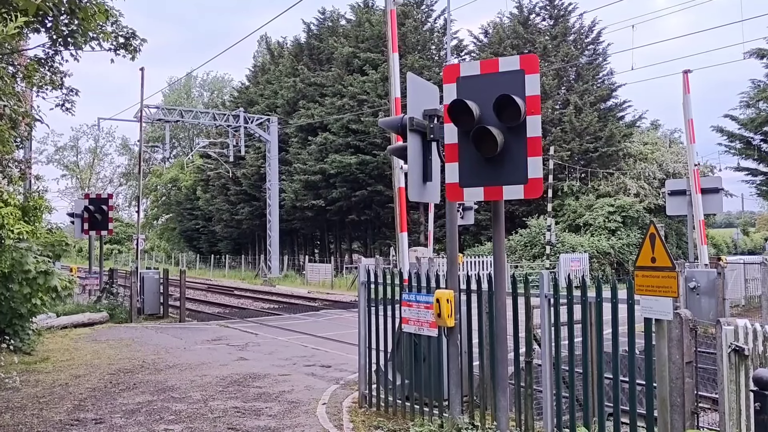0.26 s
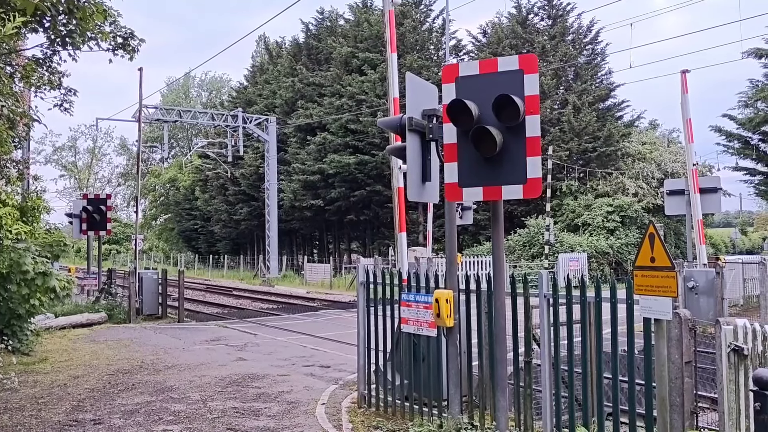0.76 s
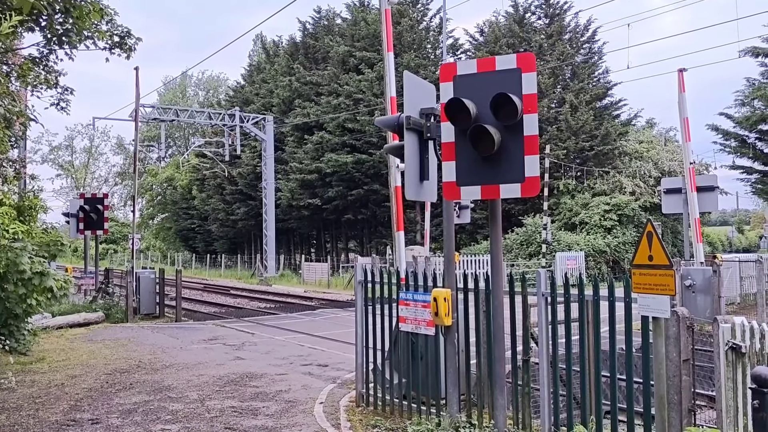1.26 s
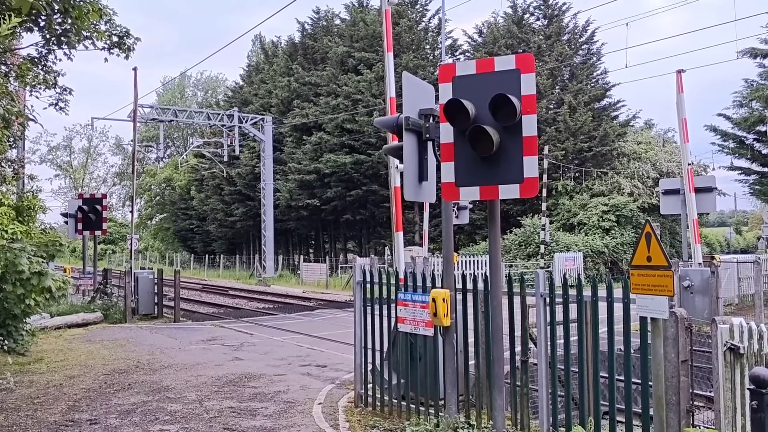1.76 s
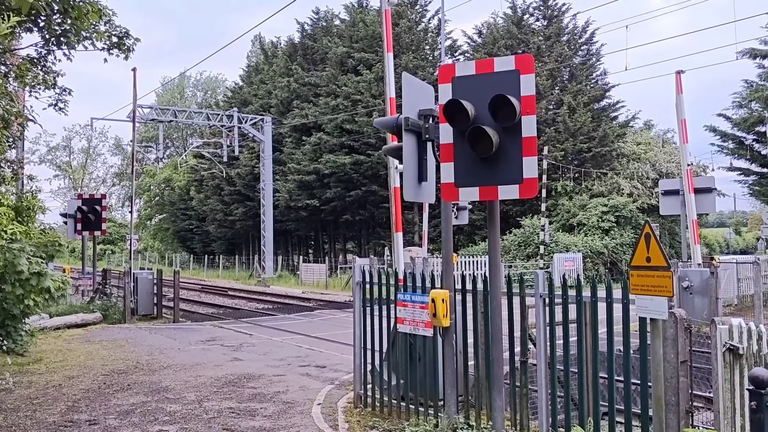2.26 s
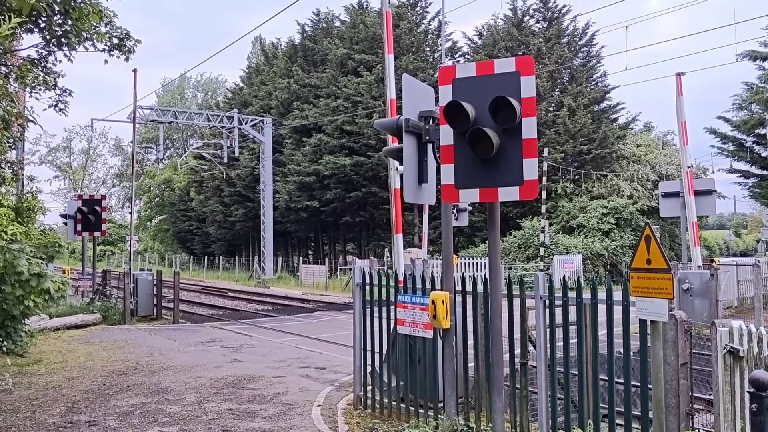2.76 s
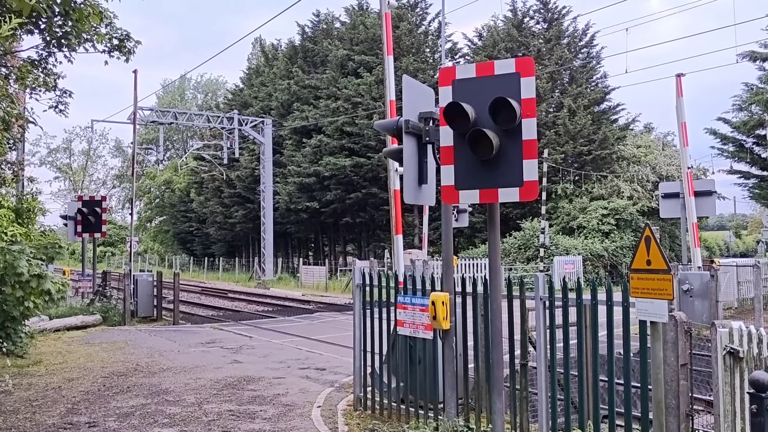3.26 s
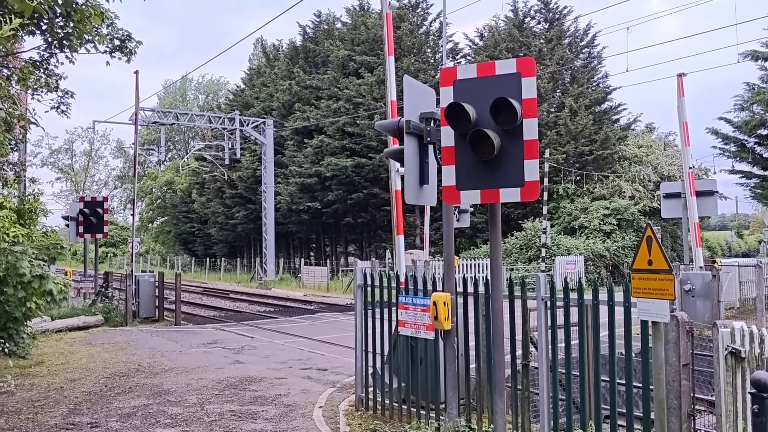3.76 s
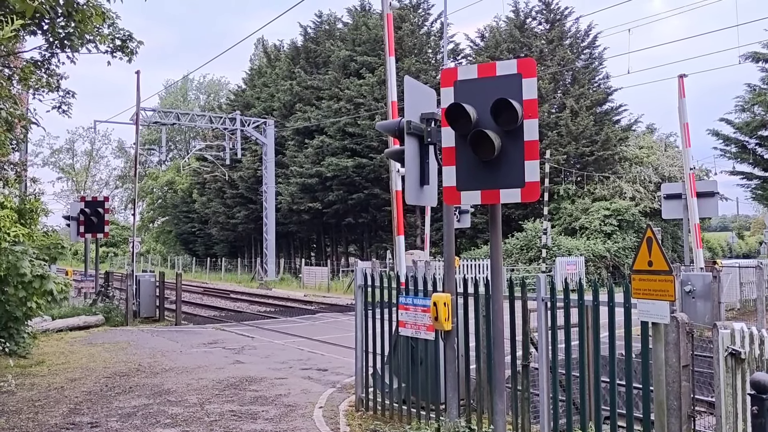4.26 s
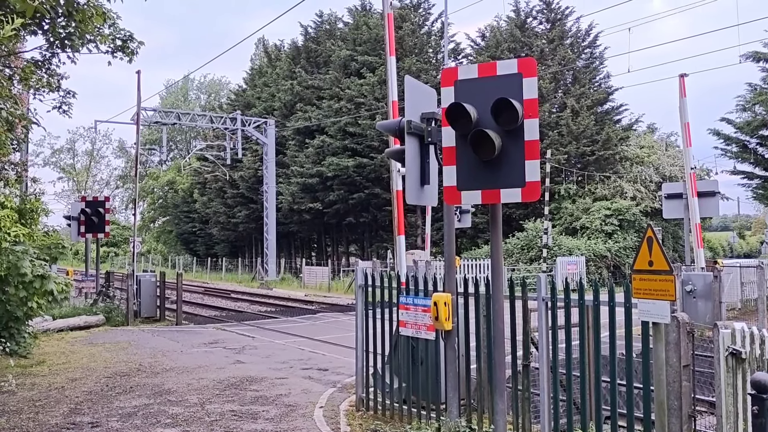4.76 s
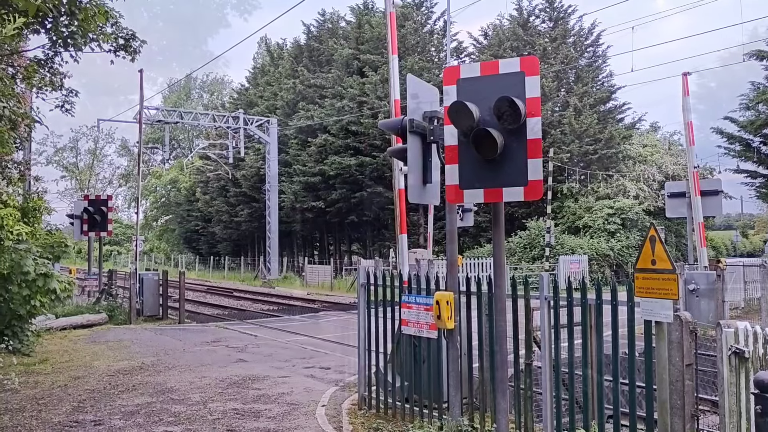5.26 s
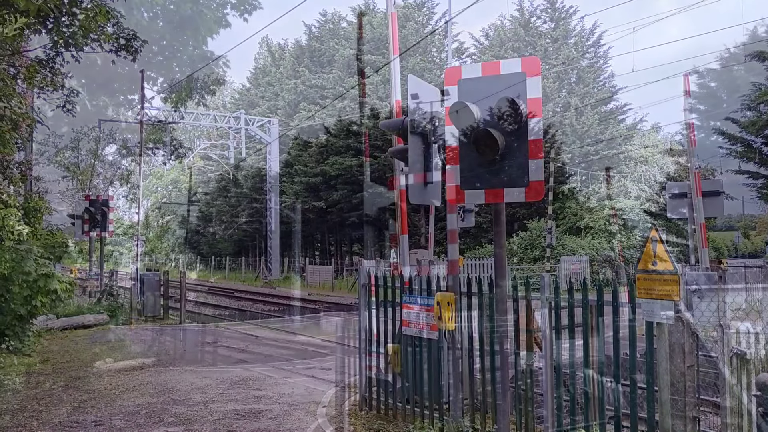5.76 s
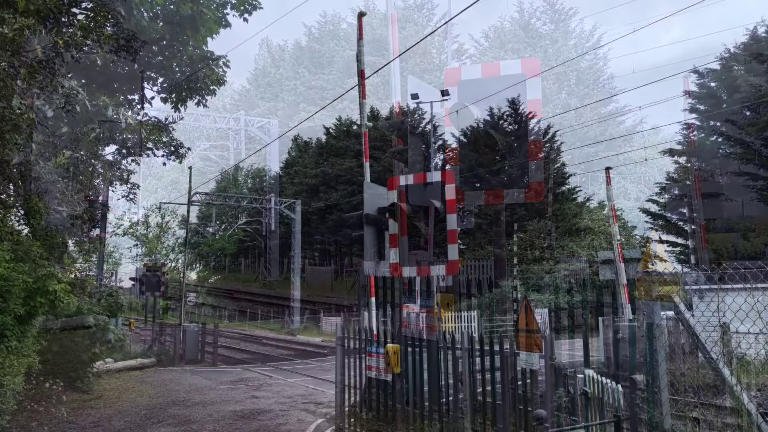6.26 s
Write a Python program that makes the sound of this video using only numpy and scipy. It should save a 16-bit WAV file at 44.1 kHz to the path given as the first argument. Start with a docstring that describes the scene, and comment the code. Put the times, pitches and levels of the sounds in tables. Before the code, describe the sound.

Clattering rods under crossing barriers knock in irregular bursts, with short dry squeaks and loose jingling between them, densest in the first two seconds and nearly gone by four. A small bird buzzes twice, chirps three times, buzzes twice more, then chirps four times, with tree echo. Distant hush and soft wind thumps on the close stereo microphone continue underneath.

```python
"""Level crossing barriers reach upright beside a country lane, over a steady hush and wind-bumped microphones.
From the start their hanging skirts clash, jingle and squeak: random impacts excite decaying modes.
A small bird soon gives rising buzzes, swept by a fast trill, then sharp chirps, slurred tones echoing off trees.
Later, far birds whistle as wavering sines. The hollow booms hum until the swaying dies away near the end."""
import sys
import numpy as np
from scipy import signal
from scipy.fft import rfft, irfft, next_fast_len
from scipy.io import wavfile
from scipy.ndimage import uniform_filter1d

SR = 44100
rng = np.random.default_rng(int(sys.argv[2]) if len(sys.argv) > 2 else 0)


def to_wav(sig):
    """Store sig (one row per channel, or 1-D mono) as 16-bit WAV at the path in sys.argv[1].

    Samples outside -1..1 are clipped; the rate is SR.
    """
    pcm = np.clip(np.atleast_2d(sig), -1, 1) * 32767
    pcm = np.round(pcm).astype(np.int16)
    wavfile.write(sys.argv[1], SR, pcm.T)  # frames by channels


N = 287091
T = np.arange(N) / SR  # s


def amp(db):
    """Level definition: converts decibels to an amplitude ratio."""
    return 10 ** (np.asarray(db) / 20)


def unit(x):
    """Power normalisation: scales to rms 1."""
    return x / np.sqrt(np.mean(x ** 2) + 1e-20)


def read(points, hz):
    """Interpolation: reads a table on a log-frequency axis."""
    f, value = np.transpose(points)
    return np.interp(np.log(hz + 1), np.log(f + 1), value)


def add(mix, s, sound):
    """Superposition: adds a sound into the mix, in place, at time s."""
    at = round(s * SR)
    sound = sound[..., max(-at, 0):]
    part = mix[..., max(at, 0):][..., :sound.shape[-1]]
    part += sound[..., :part.shape[-1]]


def colour(x, points):
    """Spectral shaping: filters by a relative spectrum; white noise keeps its power."""
    size = next_fast_len(x.shape[-1] + 4096)
    gain = unit(amp(read(points, np.fft.rfftfreq(size, 1 / SR))))
    return irfft(rfft(x, size) * gain, size)[..., :x.shape[-1]]


def lean(pair, points):
    """Interchannel level difference: tilts a stereo pair left or right, band by band."""
    size = next_fast_len(N + 4096)
    side_db = read(points, np.fft.rfftfreq(size, 1 / SR)) / 2
    return irfft(rfft(pair, size) * amp([side_db, -side_db]), size)[:, :N]


def drift(size, rate):
    """Slow random modulation: joins random values, rate of them a second, by straight lines."""
    at = np.arange(size) * rate / SR
    return np.interp(at, np.arange(4096), rng.standard_normal(4096))


def knocks(per_s, spread_db):
    """Random impulse process: a stream of tiny contacts of uneven size."""
    signs = rng.choice([-1., 1.], N)
    sizes = signs * amp(spread_db * np.clip(rng.standard_normal(N), -2, 2))
    return unit(sizes * (rng.random(N) < per_s / SR))


# Reverberation time of the tree echo: (f/Hz, t60/s)
TREE_T60 = [(200, 0.98), (1000, 0.64), (4400, 0.46), (8000, 0.44), (15000, 0.055)]


def outdoors(x, lag, near_db, near_t60, far_db, alike):
    """Multipath propagation: direct sound (left leads by lag samples), near scatter, long echo off trees."""
    taps = rng.choice([-1., 1.], (5, SR)) * (rng.random((5, SR)) < .06)
    t = np.arange(SR) / SR
    # alike: share of the scatter that arrives from the source's direction
    directed = np.array([taps[4], np.roll(taps[4], lag)])
    scatter = np.sqrt(alike) * directed + np.sqrt(1 - alike) * taps[:2]
    near = scatter * amp(-60 * t / near_t60) * (t > .002)
    # the tree echo builds up over 39 ms, and each band decays at its own rate
    hz, when, z = signal.stft(taps[2:4] * np.minimum(t / 0.039, 1), SR, nperseg=256)
    decay = amp(-60 * when / read(TREE_T60, hz)[:, None])
    far = signal.istft(z * decay, SR, nperseg=256)[1][:, :SR]
    echo = (amp(near_db) * unit(near) + amp(far_db) * unit(far)) / np.sqrt(SR)
    direct = np.array([x, np.roll(x, lag)])
    return direct + signal.fftconvolve(x[None], echo, axes=1)[:, :N]


def long_waves(pair, below_hz=950):
    """Small phase difference at long wavelengths: the lows are drawn toward the left port's signal."""
    low = signal.sosfiltfilt(signal.butter(3, below_hz, fs=SR, output="sos"), pair)
    return pair + 0.78 * (low[0] - low)


# Spectrum of the distant countryside: (f/Hz, relative level/dB)
AIR_SPECTRUM = [(20, 2), (70, 0.5), (200, -16), (370, -24), (520, -16.5), (800, -15.5), (1050, -27),
                (1650, -31), (1950, -23), (3000, -40), (5000, -52), (7000, -40.5), (8500, -56.5),
                (16000, -62)]
# Left-right correlation: (f/Hz, coefficient)
AIR_LIKENESS = [(50, 0.82), (200, 0.91), (600, 0.27), (1500, 0.088), (4000, 0.091)]
# Left minus right: (f/Hz, level/dB)
AIR_SIDE = [(100, 0.5), (800, -1.5), (1300, 0), (2300, -13), (4400, 16), (7500, 3), (14000, 3)]
AIR_START_DB, AIR_EASE_DB = -50, 4  # level before the left-right tilt, and its fall over the whole scene


def air():
    """Partially coherent noise: the steady hush of far traffic and leaves, easing slowly."""
    size = next_fast_len(N)
    hz = np.fft.rfftfreq(size, 1 / SR)
    left, other = rfft(rng.standard_normal((2, size)))
    same = np.clip(read(AIR_LIKENESS, hz), -1, 1)
    right = same * left + np.sqrt(1 - same ** 2) * other
    pair = irfft(np.array([left, right]) * amp(read(AIR_SPECTRUM, hz)), size)[:, :N]
    return lean(unit(pair), AIR_SIDE) * amp(AIR_START_DB - AIR_EASE_DB * T / T[-1])


# Strongest gusts on the microphone ports: (t/s, length/s, level/dB, left minus right/dB)
GUSTS = [(-.04, 0.16, -31.5, 14.5), (0.137, 0.17, -38, 16), (0.344, 0.078, -25.5, 14.5),
         (0.362, .2, -30.5, 6), (0.541, 0.021, -31.5, 28.5), (0.578, .16, -29.5, -3.5),
         (0.997, 0.12, -38.5, 13), (1.941, .12, -39.5, 15), (2.504, 0.18, -48, 29.5),
         (2.65, 0.068, -37, 15), (2.852, 0.548, -40, 2), (3.104, 0.069, -32, 8.5),
         (4.676, 0.06, -45.5, 18.5), (5.138, 0.032, -37.5, 10.5), (5.214, .1, -47.5, 23),
         (6.368, 0.043, -47.5, 22.5)]
# Spectrum of the gust eddies: (f/Hz, relative level/dB per Hz)
GUST_SPECTRUM = [(10, -25.5), (30, 5), (70, 3.5), (150, -7.5), (270, -22.5), (450, -37.5), (900, -47.5),
                 (3000, -83.5)]
# Spectrum of the light wind between gusts: (f/Hz, relative level/dB per Hz)
BREEZE_SPECTRUM = [(10, -21.0), (40, 19), (90, -17.0), (200, -31.5), (800, -70.0)]
BREEZE_START_DB, BREEZE_EASE_DB_PER_S = -45, 2


def wind(soft_hz=130, hard_db=-30):
    """Turbulent pressure: eddies buffet each port separately; hard gusts hold more small, higher eddies."""
    strength = np.zeros((2, N))
    for s, length, db, side_db in GUSTS:
        sides = amp([[db + side_db / 2], [db - side_db / 2]])
        add(strength, s, sides * np.sqrt(np.hanning(int(length * SR))))
    eddies = unit(colour(rng.standard_normal((2, N)), GUST_SPECTRUM))
    large = signal.sosfiltfilt(signal.butter(2, soft_hz, fs=SR, output="sos"), eddies)
    eddies = large + np.minimum(strength / amp(hard_db), 1) * (eddies - large)
    eddies /= np.sqrt(uniform_filter1d(eddies ** 2, 2200, axis=1) + 0.013)  # evens out the running level
    breeze = unit(colour(rng.standard_normal((2, N)), BREEZE_SPECTRUM))
    breeze_db = BREEZE_START_DB - BREEZE_EASE_DB_PER_S * T + 2.7 * drift(N, 19.0)
    return strength * eddies + breeze * amp(breeze_db)


# Whistles of far birds: (t/s, length/s, f/Hz, level/dB before echo and mix)
WHISTLES = [(2.96, 0.11, 5160, -73), (3.149, .65, 7050, -79), (3.957, .33, 5530, -72),
            (5.218, 0.022, 2604, -59), (5.87, .09, 3200, -76), (5.903, 0.18, 5570, -67.5),
            (6.131, 0.27, 7100, -73), (6.353, 0.23, 5270, -67)]


def far_birds(waver=.02):
    """Frequency modulation: thin whistles from deep in the trees waver by a share of their pitch."""
    out = np.zeros(N)
    for s, length, hz, db in WHISTLES:
        size = int(length * SR)
        phase = 2 * np.pi * np.cumsum(hz * (1 + waver * drift(size, 250))) / SR
        add(out, s, amp(db) * np.sin(phase) * signal.windows.tukey(size, .5))
    return out


# The bird's buzzes: (t/s, level/dB before swell, echo and mix)
BUZZES = [(0.554, -27.5), (1.616, -27), (3.682, -26), (4.748, -27)]
BUZZ_S, BUZZ_SWELL_S = .157, 0.047
BUZZ_LOW_HZ, BUZZ_LOW_RISE_HZ = 3224, 340  # bottom of the trill: lifts late
BUZZ_HIGH_HZ, BUZZ_HIGH_RISE_HZ = 3675, 1670  # top of the trill: climbs and levels off


def buzzes(trill_hz=69, overtone_db=-54, start_db=-30):
    """Wide frequency modulation: a fast trill sweeps a rising whistle up and down, loudest in mid-sweep."""
    out = np.zeros(N)
    t = np.arange(0, BUZZ_S, 1 / SR)
    low = BUZZ_LOW_HZ + BUZZ_LOW_RISE_HZ * (t / BUZZ_S) ** 2
    high = BUZZ_HIGH_HZ + BUZZ_HIGH_RISE_HZ * np.sin(np.pi / 2 * t / BUZZ_S)
    swell = amp(start_db * np.exp(-2 * t / BUZZ_SWELL_S)) * signal.windows.tukey(len(t), .1)
    for s, db in BUZZES:
        trill = 2 * np.pi * np.cumsum(trill_hz * (1 + 0.033 * drift(len(t), 81.3))) / SR
        height = (1 + signal.sawtooth(trill, .5)) / 2  # triangle between low (0) and high (1)
        phase = 2 * np.pi * np.cumsum(low + (high - low) * height) / SR
        voice = np.sin(phase) + amp(overtone_db) * np.sin(2 * phase)
        voice *= .25 + np.sin(np.pi * height) ** 2
        add(out, s, amp(db) * unit(voice) * swell)
    return out


# The bird's chirps: (t/s, top f/Hz, level/dB before swell, echo and mix)
CHIRPS = [(2.097, 4393, -20.5), (2.35, 4320, -22), (2.614, 4392, -17), (5.262, 4440, -24),
          (5.466, 4410, -28), (5.698, 4374, -24), (5.996, 4380, -23.5)]
CHIRP_S, CHIRP_RELEASE_S, CHIRP_DROP = 0.05, .005, 0.051  # the note sags by this share as it ends
SLUR_DEPTH, SLUR_S = 0.3, .0095  # it starts this share below its top pitch
OPENING_DB, OPENING_S = -33.5, 0.012  # and swells from a soft start


def chirps(twitter_s=0.033, start_hz=4500, end_hz=4800, swing_hz=1250, shake_hz=170, lead_s=0.02, twitter_db=-21):
    """Frequency glide: a faint high twitter, then an upward slur that settles on a clear note."""
    out = np.zeros(N)
    t = np.arange(0, CHIRP_S, 1 / SR)
    ending = np.clip(1 - (CHIRP_S - t) / CHIRP_RELEASE_S, 0, 1)
    pitch = 1 - SLUR_DEPTH * np.exp(-(t / SLUR_S) ** 2) - CHIRP_DROP * ending ** 2
    swell = amp(OPENING_DB * np.exp(-t / OPENING_S)) * (1 - ending) * signal.windows.tukey(len(t), .08)
    u = np.linspace(0, 1, int(twitter_s * SR))  # progress through the twitter
    for s, hz, db in CHIRPS:
        phase = 2 * np.pi * np.cumsum(hz * pitch * (1 + .0015 * drift(len(t), 150))) / SR
        add(out, s, amp(db) * unit(np.sin(phase)) * swell)
        shake = np.sin(2 * np.pi * (shake_hz * twitter_s * u + rng.random()))
        zigzag = start_hz + (end_hz - start_hz) * u ** 2 + swing_hz * (.5 + u) * shake
        twitter = np.sin(2 * np.pi * np.cumsum(zigzag) / SR) * np.sin(np.pi * u)
        add(out, s - lead_s, amp(db + twitter_db) * twitter)
    return out


# Squeaks of dry pivots: (t/s, f/Hz, level/dB before echo and mix)
SQUEAKS = [(0.398, 2955, -36.5), (.785, 5030, -43.5), (.874, 4950, -45.5), (.982, 3432, -30),
           (1.378, 4950, -51.5), (1.402, 2907, -49), (2.46, 3025, -51), (2.845, 2970, -49.5),
           (3.065, 2967, -53.5), (3.303, 2953, -58), (3.497, 2970, -53)]
# length at the typical level; it doubles with this much more level
SQUEAK_S, SQUEAK_DB, SQUEAK_DOUBLING_DB = .028, -40.5, 21


def pivots():
    """Stick-slip: a sticking pivot sings briefly on one mode of its rod, longer the harder it is pressed."""
    out = np.zeros(N)
    for s, hz, db in SQUEAKS:
        size = int(SQUEAK_S * 2 ** ((db - SQUEAK_DB) / SQUEAK_DOUBLING_DB) * SR)
        phase = 2 * np.pi * np.cumsum(hz * (1 + .004 * drift(size, 400))) / SR
        flutter = amp(2.5 * drift(size, 250))
        squeak = unit(np.sin(phase) * flutter) * signal.windows.tukey(size, .5)
        add(out, s, amp(db) * squeak)
    return out


ROD_LOW_HZ, ROD_HIGH_HZ, ROD_T60_S = 2010, 3802, 0.051  # rods are tuned across about this range


def rod_notes(force, per_s=14, spread_db=4, count=32):
    """Free vibration: now and then a contact catches one rod squarely, and it clinks at its own pitch."""
    t = np.arange(0, .1, 1 / SR)
    out = np.zeros(N)
    for hz in np.geomspace(ROD_LOW_HZ, ROD_HIGH_HZ, count) * rng.uniform(.985, 1.015, count):
        note = np.sin(2 * np.pi * hz * t) * amp(-60 * t / ROD_T60_S)
        hits = force * knocks(per_s, spread_db)
        out += signal.oaconvolve(hits, note / np.linalg.norm(note))[:N]
    return out / np.sqrt(count)


# Ringing of the rods and the hollow boom: (lowest f of each pair/Hz, relative level/dB, t60/s)
MODES = [(158, -18.5, 0.69), (191.7, -19.5, 0.95), (218.8, -15, 0.45), (275.4, -19, 1), (323, -19, 0.13),
         (600, -19.5, 0.5), (800, -27.5, 0.29), (910, -31, 0.056), (1315, -22, 0.12), (1900, -33.5, 0.21),
         (2270, -35.5, 0.43), (2297, -25.5, 0.11), (2407, -19.5, 0.19), (3100, -28.5, 0.82),
         (3473, -10, 0.26), (4980, -22, 0.3), (10400, -50, .3)]


def ring(blows, heavy, split_hz=1000):
    """Modal superposition: heavy blows set the low modes humming; any contact rings the rods, in close pairs."""
    t = np.arange(SR) / SR
    response = np.zeros((2, SR))  # low modes, high modes
    for hz, db, t60 in MODES:
        pair = np.sin(2 * np.pi * hz * rng.uniform(1.0, 1.008, (2, 1)) * t).sum(0)
        mode = unit(pair * amp(-60 * t / t60))
        response[int(hz > split_hz)] += amp(db) * mode / np.sqrt(SR)
    return signal.fftconvolve(np.array([heavy, blows]), response, axes=1).sum(0)[:N]


# Skirt rods clash at the ends of each sway: (t/s, hold/s, strength/dB, treble relative to it/dB)
CLASHES = [(0.081, 0.0032, -23.5, -1), (0.154, .003, -34, -15.5), (0.258, 0.025, -34.5, -7.5),
           (0.398, 0.008, -24.5, -16.5), (0.425, 0.017, -23.5, -3), (0.55, .002, -40.5, -2.5),
           (.652, 0.0061, -27.5, -1), (0.886, 0.0067, -37.5, -7), (0.966, 0.014, -29, -13),
           (1.016, .022, -32, 1), (1.202, 0.01, -30.5, -4.5), (1.277, 0.017, -38.5, -26),
           (1.535, 0.036, -34, -7.5), (1.626, 0.014, -34, -2.5), (1.701, 0.071, -38.5, -1.5),
           (2.116, 0.0091, -38.5, -15), (2.25, 0.035, -37, -1), (2.298, 0.0036, -32, -6.5),
           (2.735, 0.0036, -48.5, -7), (2.869, 0.031, -37.5, -5), (3.444, .025, -49, -16.5),
           (3.53, 0.0063, -37, -8), (4.031, 0.047, -56, -26)]
# Body of a clash: (f/Hz, relative level/dB per Hz)
CLANK_SPECTRUM = [(300, -37), (750, -6), (1050, -23), (1500, -13.5), (2100, -7), (3000, -3), (3900, -9.5),
                  (5500, -18), (8000, -30), (16000, -97)]
# Bright edge of a clash: (f/Hz, relative level/dB per Hz)
EDGE_SPECTRUM = [(1500, -20.5), (4000, 6.5), (6500, 4.5), (8500, -0.5), (10000, 5), (12000, -6),
                 (14000, -17.5), (16000, 2)]
# Dull shudder of the boom under a clash: (f/Hz, relative level/dB per Hz)
THUD_SPECTRUM = [(60, -7.5), (170, 2), (280, 1.5), (370, -1.5), (470, -26), (700, -18), (900, -23),
                 (1200, -30), (3000, -63)]
CLASH_RISE_S, CLASH_FADE_S = 0.003, 0.012
LOOSE_DB, LOOSE_FADE_S = -20, 0.082  # a clash leaves the rods jingling, relative to its strength
SWAY_DB, REST_S = -46, 5.92  # so does the sway itself, until friction brings it to rest


def skirt(clank_db=-1, jingle_edge_db=-17, herald_db=-15, herald_s=0.017, thud_db=-5,
          steady_db_per_s=3.0, clink_db=-4.5, rattle_db=-1.5):
    """Multiple impact: each clash is a short avalanche of rod contacts; loose rods keep jingling after it."""
    body, edge, stirred = np.zeros((3, N))  # powers
    for s, hold, db, treble_db in CLASHES:
        before, after = np.maximum(s - T, 0), np.maximum(T - s - hold, 0)
        blow = np.exp(-(before / CLASH_RISE_S + after / CLASH_FADE_S).clip(0, 40))
        # weaker contacts lead into the blow and trail it
        herald = amp(herald_db) * np.exp(-((before + after) / herald_s).clip(0, 40))
        power = blow ** 2 + herald ** 2
        body += amp(db) ** 2 * power
        edge += amp(db + treble_db) ** 2 * power
        stirred += (amp(db + LOOSE_DB) * np.exp(-after / LOOSE_FADE_S) * (T > s)) ** 2
    clumps = unit(amp(2.5 * drift(N, 330).clip(-1.5, 1.5)))
    contacts = knocks(per_s=3000, spread_db=3) * clumps
    sway = amp(SWAY_DB) * np.maximum(1 - T / REST_S, 0) ** 2
    loose = knocks(per_s=1400, spread_db=8) * np.sqrt(stirred + sway ** 2)
    loose *= amp(3 * drift(N, 40).clip(-2, 2))  # the rods touch in little flurries
    blows = amp(clank_db) * np.sqrt(body) * contacts + loose
    bright = np.sqrt(edge) * contacts + amp(jingle_edge_db) * loose
    heavy = blows * amp(-steady_db_per_s * T)  # the boom itself shakes less as it settles
    clinks = rod_notes(np.sqrt(body + stirred))
    rods = amp(rattle_db) * colour(blows, CLANK_SPECTRUM) + colour(bright, EDGE_SPECTRUM)
    rods += amp(clink_db) * clinks
    return rods + amp(thud_db) * colour(heavy, THUD_SPECTRUM) + ring(blows, heavy)


# Left minus right of the barrier: (f/Hz, level/dB)
BARRIER_SIDE = [(150, 0), (700, -1.5), (1300, 1), (2300, -7.5), (4400, -2.5), (7500, 3), (11000, -1.5)]
BARRIER_LAG, BIRD_LAG = 21, -12  # samples by which the left port leads


def scene():
    """Arrival-time difference: the near barrier sounds from the left, the bird from the right, through foliage."""
    distant = outdoors(far_birds(), lag=0, near_db=7.5, near_t60=0.24, far_db=0.5, alike=0.47)
    song = amp(-2.0) * buzzes() + chirps()
    bird = outdoors(song, lag=BIRD_LAG, near_db=-.5, near_t60=0.22, far_db=-5.0, alike=0.29)
    squeaks = outdoors(pivots(), lag=BARRIER_LAG, near_db=-9, near_t60=.06, far_db=-18, alike=0)
    barrier = outdoors(skirt(), lag=BARRIER_LAG, near_db=0, near_t60=.08, far_db=-9, alike=0)
    crossing = lean(long_waves(amp(-3.0) * barrier + amp(8) * squeaks), BARRIER_SIDE)
    return air() + wind() + amp(-1.5) * distant + amp(-6) * bird + crossing


def record(dry, cut_hz=15900):
    """Band limitation: a linear-phase low-pass filter sets the recorder's upper limit."""
    lowpass = signal.firwin(511, cut_hz, window=("kaiser", 9), fs=SR)
    return signal.oaconvolve(dry, lowpass[None], "same", axes=1)


dry = scene()
out = record(dry)
to_wav(out)
```